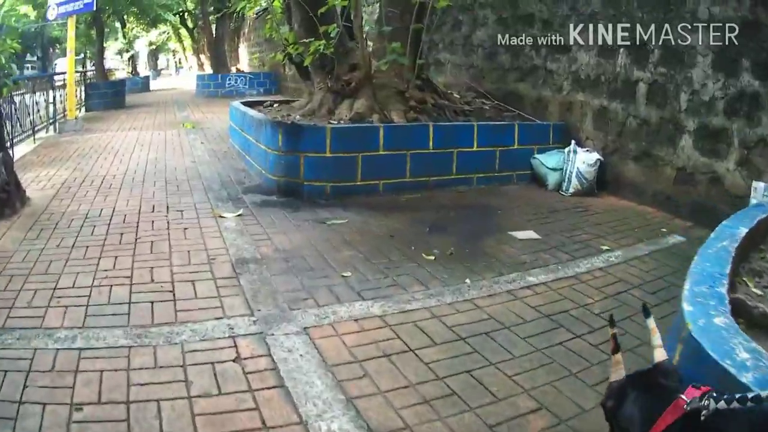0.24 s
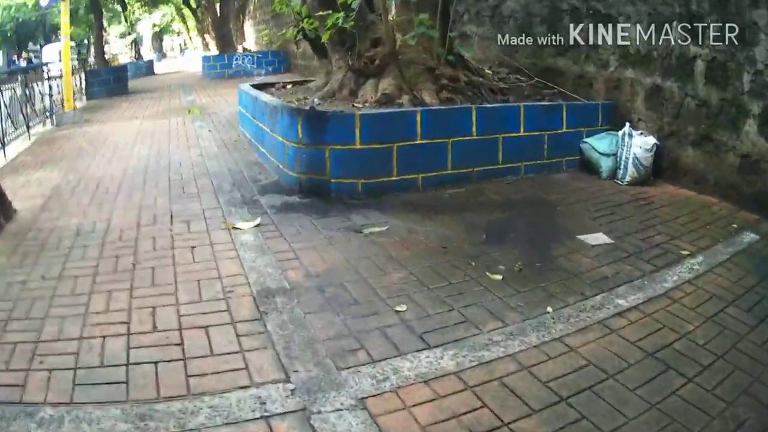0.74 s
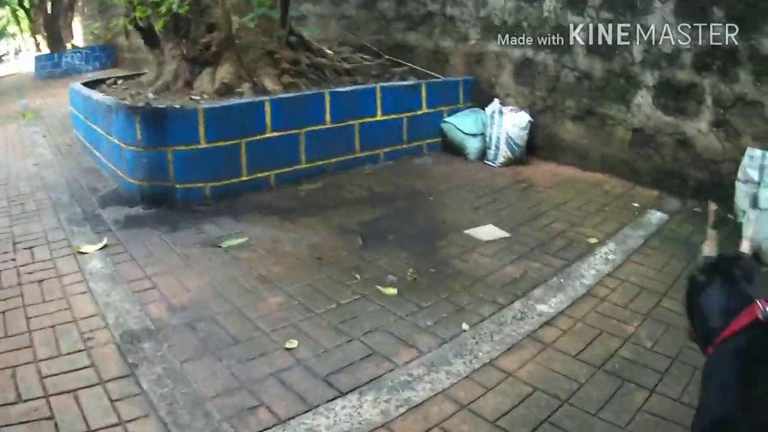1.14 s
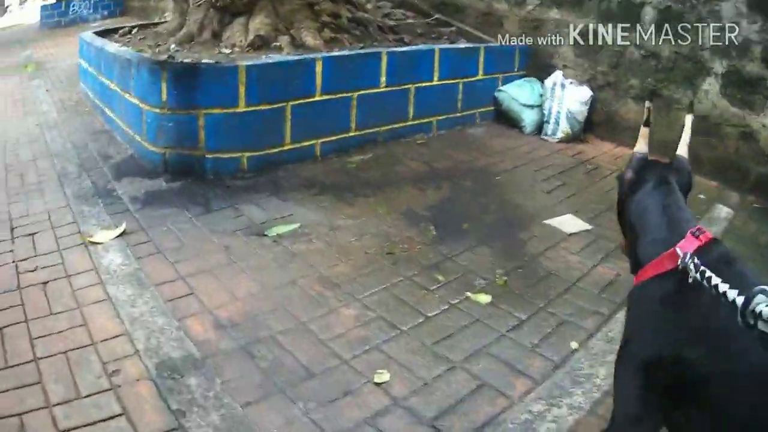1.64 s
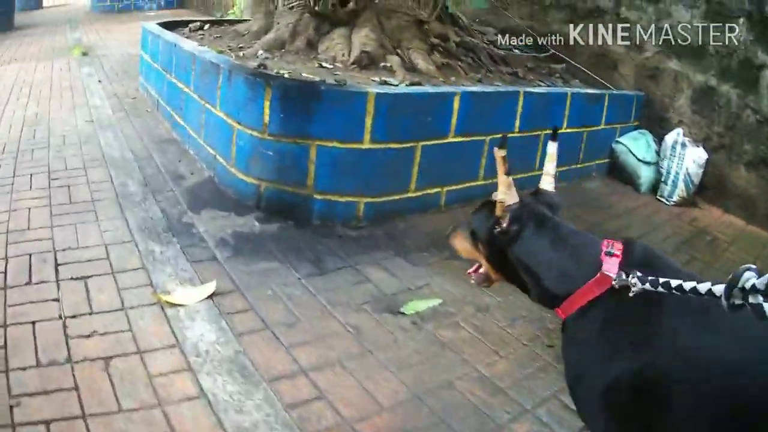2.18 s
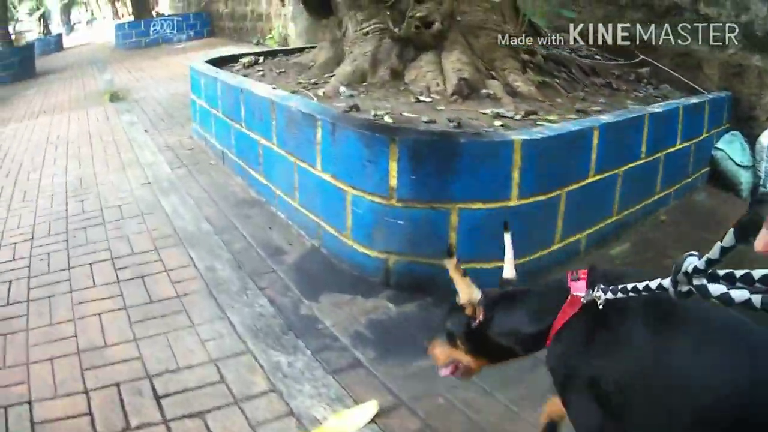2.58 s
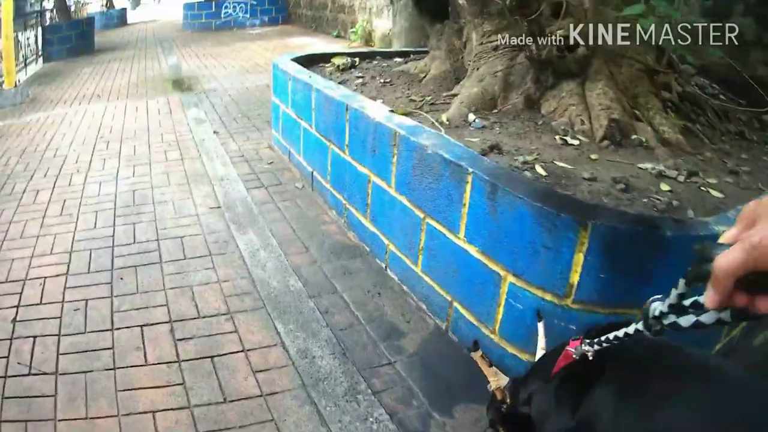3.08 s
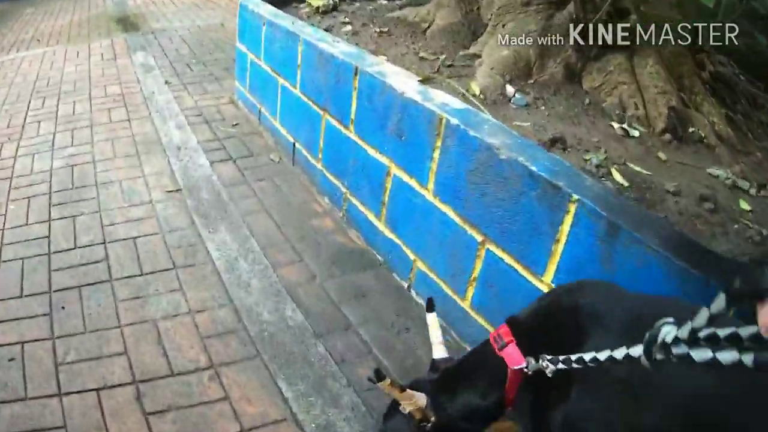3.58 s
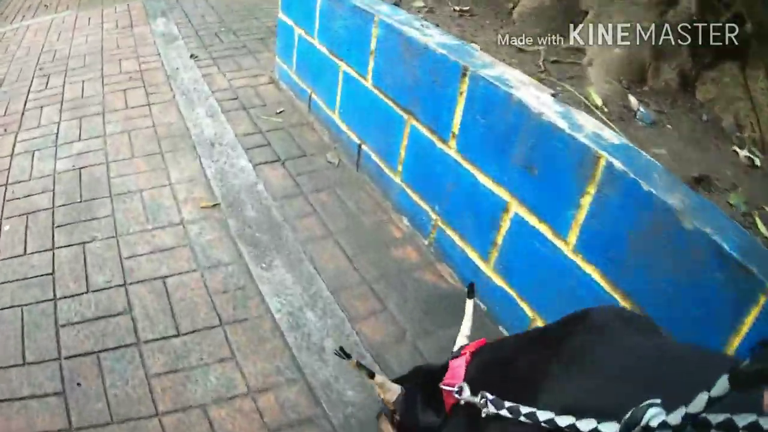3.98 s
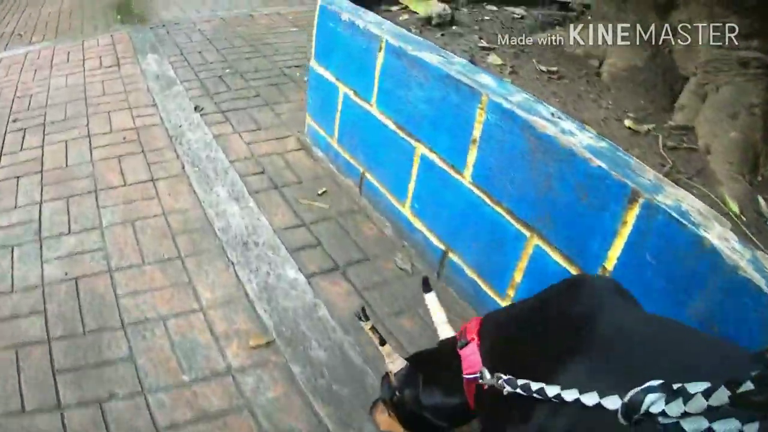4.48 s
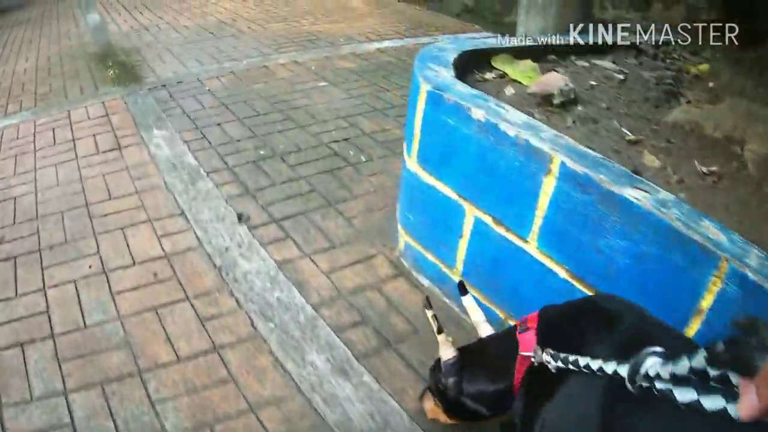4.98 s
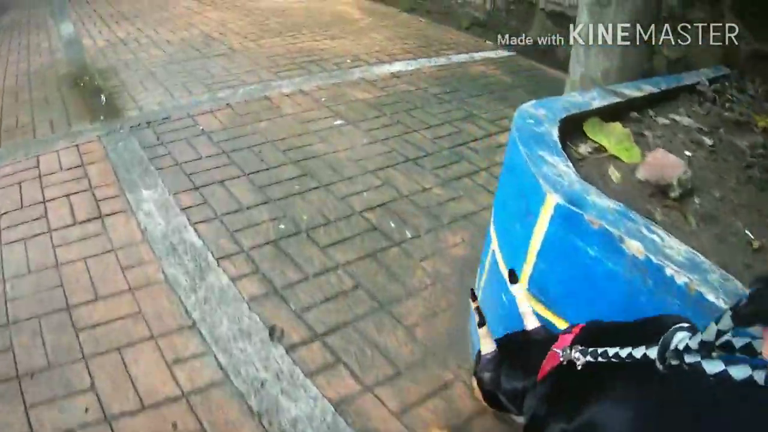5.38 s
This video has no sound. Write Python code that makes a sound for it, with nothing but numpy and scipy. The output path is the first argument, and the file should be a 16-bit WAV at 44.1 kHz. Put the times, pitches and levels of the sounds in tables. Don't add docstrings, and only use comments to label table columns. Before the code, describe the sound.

Birds whistle, rattle and trill in echoing trees over a faint low motor hum, with claw ticks and one sharp overloaded bump on the microphone.

```python
import sys
import numpy as np
from scipy import signal
from scipy.fft import rfft, irfft, next_fast_len
from scipy.io import wavfile
from scipy.ndimage import uniform_filter1d

SR = 44100
rng = np.random.default_rng(int(sys.argv[2]) if len(sys.argv) > 2 else 0)


def put_to_file(sound):
    columns = np.atleast_2d(sound).T
    safe = np.clip(columns, -1, 1)
    whole_steps = np.round(safe * 32767)
    wavfile.write(sys.argv[1], SR, whole_steps.astype(np.int16))


def volts(x):
    e = np.asarray(x, float) / 20
    return 10 ** e


N = 248283
CAPSULE_STOP = .5


def rms_one(x):
    return x / np.sqrt(np.mean(x ** 2) + 1e-20)


def in_time(rows):
    s, *columns = np.vstack(rows).T
    return [np.interp(np.arange(N) / SR, s, c) for c in columns]


def drift(rate, size):
    r = np.exp(-2 * np.pi * rate / SR)
    slow = signal.lfilter([1], [1, -2 * r, r * r], rng.standard_normal(size + 8000))
    return rms_one(slow[8000:])


def coloured(spectrum):
    hz, level_db = np.transpose(spectrum)
    grid = np.maximum(np.arange(N // 2 + 1) * SR / N, 1)
    gain = volts(np.interp(np.log(grid), np.log(hz), level_db, left=-90, right=-90))
    return rms_one(irfft(rfft(rng.standard_normal(N)) * gain, N))


def filtered(x, order, hz, kind="low"):
    return signal.sosfilt(signal.butter(order, hz, kind, fs=SR, output="sos"), x)


def sing(notes, waver_hz, waver_rate=86.0, trill_hz=0, beats_per_s=76.0, throb=0, second_db=-70,
         size=400, split_db=-90, third_db=-90):
    out = np.zeros(N)
    for rows in notes:
        s, hz, level_db = np.transpose(rows)
        at = np.arange(int(s[0] * SR), min(int(s[-1] * SR), N))
        t = at / SR
        beat_rate = beats_per_s * (1 + .2 * drift(30, size=len(t)))
        beat = 2 * np.pi * np.cumsum(beat_rate) / SR + 6 * rng.random()
        path = uniform_filter1d(np.interp(t, s, hz), size=min(len(t) // 16, size), mode="nearest")
        pitch = path + waver_hz * drift(waver_rate, size=len(t)) + trill_hz * np.sin(beat)
        phase = 2 * np.pi * np.cumsum(pitch) / SR
        edge = np.clip(np.minimum(t - s[0], s[-1] - t) / 0.004, 0, 1)
        level = np.sqrt(2) * volts(np.interp(t, s, level_db)) * edge
        level = level * (1 + np.clip(throb, 0, 1) * np.cos(beat))
        over = volts(second_db) * np.sin(2 * phase) + volts(third_db) * np.sin(3 * phase)
        over += volts(split_db) * np.sin(3 * phase / 2)
        out[at] += level * (np.sin(phase) + over)
    return out


def glides(rows, attack, onset_db, fade_db):
    share = np.clip(attack, .01, .99)
    return [[(s, a, db + onset_db), (s + share * long, a + share * (b - a), db), (s + long, b, db + fade_db)]
            for s, long, a, b, db in rows]


def scatter(t60, gap_s):
    t = np.arange(int(1.3 * SR)) / SR
    cloud = rng.standard_normal(len(t)) * volts(-60 * t / t60) * np.clip(t / gap_s, 0, 1)
    return cloud / np.sqrt(np.sum(cloud ** 2))


def heard(voice, direct_db, leaves_db, grove_db, low_db=0):
    leaves, grove = scatter(t60=0.073, gap_s=0.0079), scatter(t60=0.86, gap_s=0.044)
    echoes = volts(leaves_db) * leaves + volts(grove_db) * grove
    high = signal.sosfiltfilt(signal.butter(4, 4000, "high", fs=SR, output="sos"), voice)
    thrown_back = high + volts(low_db) * (voice - high)
    return volts(direct_db) * voice + signal.fftconvolve(thrown_back, echoes)[:N]


def hum(hz, level_db, unsteady):
    level = np.sqrt(2) * volts(level_db + unsteady * drift(14, size=N))
    return level * np.sin(2 * np.pi * np.cumsum(hz + np.zeros(N)) / SR)


def engines():
    # t/s, level/dB
    motor = [(0, -51.5), (1.1, -45), (1.75, -46), (2.0, -44), (3.1, -46), (3.5, -44), (4.1, -49),
             (4.3, -59), (5.2, -60.5), (5.63, -54)]
    drones = [(.75, 57.5, -44.5, 19.5), (2.821, 59.45, -41, 44.5), (4.651, 56.3, -43.5, 26)]
    t = np.arange(N) / SR
    passing = sum(hum(hz, db - fade * np.abs(t - s), .6) for s, hz, db, fade in drones)
    return hum(102.3 + 0.64 * drift(5.0, size=N), in_time(motor)[0], 2.4) + passing


def town_and_far_chorus():
    # t/s, town level/dB, chorus level/dB
    wash = [(0, -51.5, -41.5), (.67, -46.5, -39.5), (1.03, -48.5, -38), (1.19, -47, -50.5),
            (1.47, -50, -46.5), (1.65, -49.5, -49.5), (2.37, -51, -51.5), (2.96, -42.5, -36.5),
            (3.26, -46, -38.5), (3.36, -44, -33.5), (4.14, -47, -38.5), (4.5, -43.5, -30.5),
            (4.72, -44, -51), (4.85, -46, -47.5), (5.2, -46, -46.5), (5.38, -49.5, -46), (5.52, -53.5, -72),
            (5.63, -50.5, -77)]
    # f/Hz, level/dB per Hz
    rumble = [(35, -23), (60, -19), (80, -3.5), (113, -3.5), (158, -9.5), (240, -15.5), (355, -12.5),
              (547, -17), (724, -17.5), (1120, -9), (1320, -19.5), (1700, -14.5), (2210, -45.5),
              (3740, -120)]
    # f/Hz, level/dB per Hz
    blur = [(820, -21), (1400, -23), (1550, -10), (1830, 3.5), (1980, 8), (2360, 3), (2650, -5.5),
            (3110, -12), (3900, -47.5), (5070, -65), (8580, -120)]
    town_db, chorus_db = in_time(wash)
    town = volts(town_db - 5.5 + 1.4 * drift(14.0, size=N)) * coloured(rumble)
    return town + volts(chorus_db - 9.0 + 3.48 * drift(8.1, size=N)) * coloured(blur)


def wind():
    # t/s, level/dB
    puffs = [(0, -42.5), (.228, -32.5), (.294, -36.5), (.434, -30.5), (.618, -34.5), (1.028, -27.5),
             (1.32, -37.5), (1.5, -48), (1.72, -39), (2.33, -51.5), (2.45, -44.5), (3.3, -38), (3.5, -43),
             (3.8, -56.5), (3.87, -38.5), (4.56, -44), (4.78, -53), (5.1, -39)]
    # f/Hz, level/dB per Hz
    gust = [(8, -6), (20, 5.5), (45, -21), (100, -26), (200, -25.5), (350, -35), (700, -69)]
    return volts(in_time(puffs)[0] - 4.5 + 0.71 * drift(39, size=N)) * coloured(gust)


def air():
    # f/Hz, level/dB per Hz
    colour = [(3300, 4), (4000, -14.5), (6300, -16), (8000, -18), (10000, -22), (13000, -25.5),
              (15500, -22)]
    return volts(-82) * coloured(colour)


def call_hiss(high_calls):
    high = filtered(high_calls, 8, 3600, "high")
    loud = np.sqrt(np.abs(uniform_filter1d(high ** 2, size=int(0.17 * SR))))
    hiss = rms_one(filtered(rng.standard_normal(N), 4, [3600, 5800], "band"))
    return (volts(-20.5) * loud + volts(-86)) * hiss


def top_hiss():
    openings = [(0.868, 1.21, -90.5, -97), (1.463, 1.61, -68, -67), (1.74, 2.31, -71.5, -70),
                (2.31, 2.8, -57.5, -74), (2.854, 3.294, -66.5, -75.5), (5.53, 5.697, -82, -66)]
    # f/Hz, level/dB per Hz
    colour = [(5500, -22.5), (5900, 3), (7000, 0.5), (7900, -10)]
    t, strength = np.arange(N) / SR, volts(-93.0)
    for opens, shuts, first_db, last_db in openings:
        level = volts(np.interp(t, [opens, shuts], [first_db, last_db]))
        strength = strength + level * ((t > opens) & (t < shuts))
    return uniform_filter1d(strength, size=int(0.018 * SR)) * coloured(colour)


def haze():
    # t/s, level/dB
    path = [(0, -110), (1.45, -110), (1.5, -92), (1.6, -104), (2.25, -104), (2.35, -92), (2.55, -100),
            (2.65, -76), (2.78, -100), (2.9, -99), (2.95, -81), (3.1, -84), (3.2, -110), (5.5, -110),
            (5.55, -84)]
    # f/Hz, level/dB per Hz
    colour = [(7700, 0.5), (9000, -5), (10500, -15.5), (13000, -29.5)]
    return volts(in_time(path)[0]) * coloured(colour)


def distant_answers():
    calls = [(0, 0.018, 1880, 1840, -46), (.07, 0.03, 2380, 2180, -52.5), (.142, 0.047, 2175, 2450, -38),
             (.132, .12, 2483, 2450, -45.5), (.17, 0.082, 2050, 1784, -44.5), (.17, 0.13, 1675, 1560, -51),
             (.32, 0.079, 1530, 1540, -54), (.33, 0.16, 2028, 2000, -43.5), (.34, 0.074, 2657, 2380, -44.5),
             (.42, 0.12, 2330, 2220, -42.5), (.54, 0.12, 2420, 2428, -40.5), (.6, 0.042, 2436, 2390, -45),
             (.58, 0.15, 1750, 1530, -48.5), (.6, 0.21, 2108, 1915, -48), (.67, .12, 2426, 2286, -44),
             (.76, 0.16, 2020, 1970, -44), (.82, 0.16, 2444, 2330, -47), (.94, 0.059, 2000, 1990, -54),
             (1.06, 0.11, 2010, 1995, -51.5), (0, 0.024, 3160, 2950, -51.5)]
    notes = glides(calls, attack=0.13, onset_db=0.5, fade_db=-9.5)
    return heard(sing(notes, 14.0, waver_rate=25.0, throb=0.2), -1.5, -10, -5)


def leash_handle():
    # t/s, f/Hz, level/dB
    creak = [
        [(.455, 336, -50), (.48, 327, -48.5), (.51, 308, -59)],
    ]
    return sing(creak, 4.0)


def claws():
    # t/s, peak level/dB
    ticks = [(0.553, -18), (0.682, -24), (0.844, -24.5), (0.982, -27.5), (1.738, -27), (1.851, -28.5),
             (2.821, -22)]
    # f/Hz, level/dB, t60/s
    brick = [(1750, 1, 0.014), (750, -12, 0.014), (460, -47, 0.0052), (1096, -9, 0.012)]
    s, tick_db = np.transpose(ticks)
    at, out = np.round(s * SR).astype(int), np.zeros(N)
    luck_db = rng.normal(0, 3.0, (len(at), len(brick)))
    for k, (hz, level_db, t60) in enumerate(brick):
        clicks = np.full(N, 1e-18)
        clicks[at] = volts(tick_db + level_db - 4.5 + luck_db[:, k])
        r, w = volts(-60 / (t60 * SR)), 2 * np.pi * hz / SR
        out += signal.lfilter([0, np.sin(w)], [1, -2 * r * np.cos(w), r * r], clicks)
    return filtered(out, 6, 2500)


def chips_and_buzzes():
    calls = [(.58, 0.11, 4370, 5500, -75), (.85, 0.33, 5910, 5790, -68.5), (.91, 0.22, 4650, 4460, -55),
             (.92, 0.35, 3570, 2924, -60.5), (1.526, 0.045, 3270, 3030, -40),
             (2.657, .033, 3310, 2780, -52.5), (3.3, 0.14, 3230, 3104, -57.5),
             (3.8, 0.053, 4270, 4480, -62.5), (3.82, .04, 3200, 3197, -52), (3.86, 0.16, 2900, 2920, -59.5),
             (4.068, 0.028, 3120, 3284, -49), (4.505, 0.027, 3350, 2930, -57.5),
             (.85, 0.085, 4000, 4250, -67.5), (4.075, 0.027, 4900, 5050, -59),
             (4.512, 0.033, 4700, 5300, -65), (5.004, .02, 4700, 5300, -66), (4.07, .05, 2750, 2650, -45.5)]
    notes = glides(calls, attack=0.032, onset_db=2.5, fade_db=-13)
    return heard(sing(notes, 370.0, waver_rate=650.0), -7.5, -0.37, -12.5)


def far_whistler():
    arches = [(.82, .885, 3110, 1.02, -53), (3.06, 3.13, 3270, 3.13, -61), (3.2, 3.21, 3600, 3.32, -58),
              (4.41, 4.47, 3050, 4.55, -52), (5.02, 5.075, 3050, 5.15, -55), (5.48, 5.6, 3450, 5.63, -62)]
    notes = []
    for start, crest, top, end, db in arches:
        t = np.linspace(start, end, 12)
        bend = np.where((t > crest) & (end - crest > .12), .2 ** 2, 1)
        hz = top - 70000 * bend * (t - crest) ** 2
        swell_db = -4.5 * (2 * (t - start) / (end - start) - 1) ** 2
        notes.append(np.transpose([t, hz, db + swell_db]))
    return heard(sing(notes, 40.0, throb=.3), -0.15, -7.0, -3.5)


def bumps():
    # t/s, push height, build-up/s, height after release, recovery/s
    pushes = [(1.2241, 4.5, .0025, -.8, .013), (1.217, .14, .022, 0, .003), (3.3635, .24, .003, .19, .011),
              (1.675, .015, .004, -.015, .01), (5.12, .015, .004, -.015, .01)]
    t, out = np.arange(N) / SR, np.zeros(N)
    for s, push, rise, after, recovery in pushes:
        away = np.abs(t - s)
        out += np.where(t < s, push * np.exp(-away / rise), after * np.exp(-away / recovery))
    out = signal.lfilter([.013], [1, -.987], np.minimum(out, 1.25 * CAPSULE_STOP))
    return filtered(np.clip(out, -CAPSULE_STOP, CAPSULE_STOP), 6, 2200)


def arcs_of(rows, tail_s, drop_s):
    notes = []
    for start, crest, top, drop, db in rows:
        t = np.arange(start, drop + tail_s, .003)
        late = np.maximum(t - drop, 0) / drop_s
        bend_hz = np.where(t > crest, 3700, 2600)
        arc = top - bend_hz * (10 * np.abs(t - crest)) ** 2
        hz = 2050 + (arc - 2050) * np.exp(-late ** 2)
        level = db - 8 * np.exp(-(t - start) / .012) + 3 * (t > crest)
        level = level - 14 * np.maximum(hz - 5000, 0) / 1000
        notes.append(np.transpose([t, hz, level]))
    return notes


def after_drop(arcs, shape):
    return [[(drop + s, hz, db + rel) for s, hz, rel in shape] for *_, drop, db in arcs]


def split_arcs():
    arcs = [(1.423, 1.502, 3890, 1.524, -45.5), (2.557, 2.64, 3876, 2.656, -38.5)]
    # t/s, f/Hz, level/dB re arc
    upper = [(.001, 4620, 2), (.016, 3470, 0), (0.041, 2600, 4.5)]
    # t/s, f/Hz, level/dB re arc
    lower = [(.002, 2600, 5), (.012, 2310, 4), (.036, 2112, 1)]
    out = sing(arcs_of(arcs, tail_s=.004, drop_s=.004), 75.0, size=100, waver_rate=180.0,
               throb=.5, second_db=-31, split_db=-19)
    out += sing(after_drop(arcs, upper), 300.0, waver_rate=250.0, beats_per_s=260.0, throb=1.0)
    return out + sing(after_drop(arcs, lower), 110.0, waver_rate=120.0, throb=0.3)


def high_arcs():
    arcs = [(1.74, 1.825, 5458, 1.883, -43.5), (2.844, 2.943, 5800, 2.999, -41)]
    open_arcs = [(2.144, 2.247, 5210, 2.292, -41)]
    # t/s, f/Hz, level/dB re arc
    plunge = [(-.002, 4495, -5.5), (.009, 2883, -1.5), (.026, 2250, -4.5)]
    notes = arcs_of(arcs, tail_s=.012, drop_s=.009) + arcs_of(open_arcs, tail_s=0, drop_s=1)
    out = sing(notes, 60.0, waver_rate=180.0, beats_per_s=45.0, throb=.5, size=100)
    return out + sing(after_drop(arcs, plunge), 300.0, waver_rate=250.0, beats_per_s=260.0, throb=1.0)


def stutter():
    # t/s, f/Hz, level/dB
    falls = [
        [(2.29, 4655, -32), (2.32, 3965, -47), (2.366, 3340, -37.5), (2.398, 2740, -40.5), (2.43, 1980, -55.5)],
        [(3.004, 3320, -37), (3.012, 2424, -27), (3.024, 2080, -32.5)],
    ]
    return sing(falls, 81.0, waver_rate=120.0, trill_hz=169.0, beats_per_s=71.0, throb=0.52, second_db=-54.0)


def whistler():
    # t/s, level/dB
    strength = [(0, 0), (3.2, 2), (3.34, -14), (4.4, -28), (4.41, 11)]
    calls = split_arcs() + high_arcs() + stutter()
    return heard(calls, -3.0, -0.79, -0.6, low_db=-11) * volts(in_time(strength)[0])


def rattles():
    rows = [(2.82, 0.092, 1894, 1624, -41), (3.332, 0.045, 2600, 2360, -36.5),
            (3.365, 0.095, 1805, 1703, -37), (3.81, 0.044, 3050, 2383, -40), (3.845, 0.12, 2600, 2540, -34),
            (3.99, 0.081, 2500, 2250, -35.5), (4.06, 0.022, 2077, 1885, -31.5),
            (4.5, 0.011, 2060, 1840, -30.5), (4.84, 0.16, 2325, 2262, -43), (3.33, .045, 2937, 2720, -38.5),
            (3.332, .03, 2160, 2050, -39.5), (3.362, 0.052, 1576, 1542, -47),
            (3.838, 0.062, 2900, 2780, -40.5)]
    notes = glides(rows, attack=.15, onset_db=-3, fade_db=-7)
    voice = sing(notes, 70.0, waver_rate=132.0, trill_hz=273.0, throb=0.5)
    return filtered(heard(voice, -3, -1.5, -11.5), 8, 3500)


def held_notes():
    rows = [(2.96, 0.057, 1850, 1777, -40.5), (2.97, 0.068, 1960, 2030, -34),
            (3.03, 0.15, 1970, 1906, -37.5), (3.2, 0.073, 2040, 1930, -52.5),
            (3.25, 0.073, 1950, 1930, -40), (3.555, 0.14, 1896, 1868, -30.5),
            (3.705, 0.14, 1900, 1842, -37.5)]
    notes = glides(rows, attack=0.3, onset_db=-5, fade_db=-1)
    return heard(sing(notes, 18.0, beats_per_s=58.0, throb=.3), -1.5, -13, -11.0)


def pulses():
    # centre t/s, width/s, f/Hz, level/dB
    beats = [(3.8343, 0.00082, 2170, -29), (3.8403, 0.002, 2454, -28.5), (3.8452, 0.0015, 2560, -26),
             (3.8511, 0.0022, 2397, -26), (3.8612, 0.0017, 2350, -26), (3.8666, 0.0018, 2480, -23.0),
             (3.8742, 0.001, 2400, -25.5), (3.8862, 0.0052, 2594, -25.5), (3.8959, 0.0021, 2444, -23.5),
             (3.9016, 0.0041, 2440, -26), (3.9091, 0.0021, 2565, -28.5), (3.917, 0.0017, 2490, -29),
             (3.9224, 0.0016, 2503, -27.5), (3.9309, 0.0017, 2333, -30), (3.9381, 0.0015, 2460, -29),
             (3.944, 0.0015, 2405, -27.5), (3.9503, 0.0014, 2444, -30.5), (3.9655, 0.0035, 2574, -31.0),
             (3.9724, 0.0022, 2545, -34.5), (4.0064, 0.0035, 2296, -29), (4.0196, 0.00093, 2310, -30.5),
             (4.0244, 0.0027, 2300, -29.5), (4.0347, 0.0012, 2465, -28), (4.0468, 0.0012, 2270, -31),
             (4.0536, 0.002, 2250, -30.5)]
    chirrups = [(4.093, 0.0088, 1856, -22.5), (4.1026, 0.0027, 1795, -26.5), (4.1078, 0.0023, 1887, -22.5),
                (4.1141, 0.0075, 1844, -21), (4.1307, 0.0126, 1880, -24.5), (4.5123, 0.0027, 1890, -34),
                (4.5194, 0.0019, 1820, -32), (4.5281, 0.0065, 1798, -22), (4.5465, 0.0049, 1777, -23.5),
                (5.0073, 0.0037, 1814, -27), (5.0149, 0.0013, 1770, -30), (5.0227, 0.0048, 1788, -21),
                (5.0295, 0.0018, 1770, -24), (5.0424, 0.0082, 1803, -22.5), (5.0502, 0.0029, 1730, -27.5)]
    trill = [(4.2536, 0.0049, 2190, -27), (4.2659, 0.0036, 2112, -23.5), (4.2749, 0.00092, 2030, -32.5),
             (4.2811, 0.0035, 1880, -22), (4.2881, 0.0014, 2280, -26.5), (4.2954, 0.0064, 1904, -26),
             (4.303, 0.0021, 1908, -23.5), (4.3119, 0.00079, 2010, -27), (4.3194, 0.0054, 1880, -23.5),
             (4.3262, 0.0024, 1913, -24.0), (4.3368, 0.0028, 1842, -24.0), (4.3484, 0.00081, 2050, -26.5),
             (4.3544, 0.0022, 1964, -24.5), (4.3597, 0.0011, 1866, -24.5), (4.7041, 0.0016, 2343, -22.5),
             (4.7096, 0.0021, 2220, -21), (4.7166, 0.0045, 2134, -27), (4.7211, 0.0007, 2010, -28),
             (4.7314, 0.0022, 1906, -25), (4.738, 0.003, 2113, -22.5), (4.7426, 0.001, 1967, -23),
             (4.7538, 0.005, 1896, -26.5), (4.7617, 0.0056, 1890, -26), (4.7756, 0.0019, 1910, -21.5),
             (4.7787, 0.0087, 1865, -24), (4.7986, 0.01, 1897, -24.5), (4.8115, 0.0014, 2060, -22),
             (4.8172, 0.0073, 1823, -27), (5.1925, 0.004, 2174, -22), (5.2003, 0.0037, 1880, -29.5),
             (5.2075, 0.0028, 1980, -26.5), (5.2156, 0.0034, 2024, -22), (5.2275, 0.0029, 1940, -21),
             (5.2328, 0.0036, 2140, -26), (5.2458, 0.0039, 1898, -31), (5.2548, 0.0021, 1910, -21),
             (5.2671, 0.0034, 2000, -25.5), (5.2713, 0.0016, 2140, -27.5), (5.277, 0.00451, 1840, -28),
             (5.2819, 0.0015, 2210, -34), (5.2911, 0.0069, 1897, -29)]
    out = np.zeros(N)
    for s, width, hz, db in list(chirrups) + list(trill) + list(beats):
        u = np.linspace(-1, 1, int((1.7 * width + .0022) * SR))
        phase = 2 * np.pi * np.cumsum(hz + 87 * (1 / 3 - u ** 2)) / SR + 6 * rng.random()
        at = int(s * SR) - len(u) // 2
        burst = np.sin(phase) + volts(-47.5) * np.sin(3 * phase)
        rounded = np.abs(np.cos(np.pi * u / 2)) ** 1.3
        out[at:at + len(u)] += np.sqrt(2) * volts(db + 0.5) * rounded * burst
    return heard(out, -.5, -14, -10)


def phrase_peaks():
    peaks = [(4.214, .04, 0.04, 2391, -21), (4.677, .027, .028, 2510, -20),
             (5.163, 0.036, .024, 2463, -17.5)]
    notes = []
    for s, step_s, crest_s, top, db in peaks:
        notes.append([(s - step_s, 2110, db - 10.5), (s - .4 * step_s, 2150, db - 4.0), (s, 2250, db - 3.5)])
        notes.append([(s, 2340, db - 3.5), (s + .55 * crest_s, top, db), (s + crest_s, top - 60, db - 9.0)])
    return heard(sing(notes, 12.0, second_db=-43, third_db=-62), -1.5, -17, -12)


def twitter():
    # t/s, bottom f/Hz, level/dB
    dips = [(5.544, 3790, -46.5), (5.576, 3470, -45), (5.598, 3624, -46.5)]
    leap_s, settle_s, top_hz = .006, .013, 6700
    path = [(dips[0][0] - settle_s, 4500, -58)]
    for s, low, db in dips:
        path += [(s - leap_s, top_hz, db - 5), (s, low, db)]
        path += [(s + leap_s, top_hz, db - 5), (s + settle_s, 5700, db)]
    notes = [path + [(N / SR, 4900, -56)]]
    voice = sing(notes, 160.0, waver_rate=200.0, beats_per_s=87.5, throb=0.79, size=70)
    return heard(voice, -0.25, -4.5, -18)


def limited(choir):
    ceiling = .1
    envelope = np.abs(signal.hilbert(choir, next_fast_len(N))[:N])
    swell = uniform_filter1d(envelope, size=40) / ceiling
    bend = np.clip(choir / ceiling / (1 + swell ** 8) ** (1 / 8), -.975, .975)
    overtones = filtered(volts(-69) * bend ** 2 + volts(-70.5) * bend ** 3, 6, 3600, "high")
    return ceiling * bend + overtones


def scene():
    background = engines() + town_and_far_chorus() + wind() + air()
    near = leash_handle() + claws() + bumps()
    far_birds = distant_answers() + chips_and_buzzes() + far_whistler()
    songster = rattles() + held_notes() + pulses() + phrase_peaks()
    high_calls = whistler() + twitter()
    hiss = call_hiss(high_calls) + top_hiss() + haze()
    return (limited(far_birds + songster + high_calls) + near + background + hiss)[None]


def top_cut(x):
    return signal.sosfilt(signal.butter(12, 15400, fs=SR, output="sos"), x)


def record(dry):
    limit = 1.01 * CAPSULE_STOP
    return top_cut(np.clip(dry, -limit, limit))


dry = scene()
out = record(dry)
put_to_file(out)
```